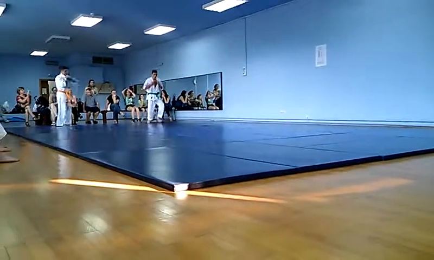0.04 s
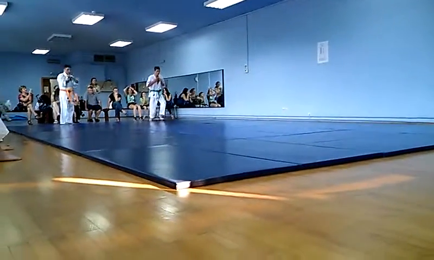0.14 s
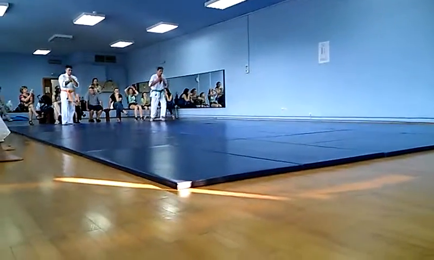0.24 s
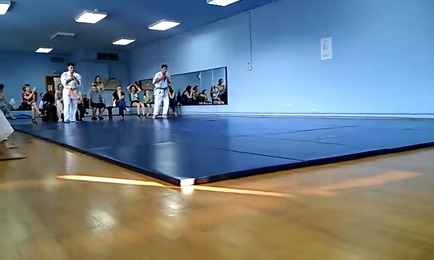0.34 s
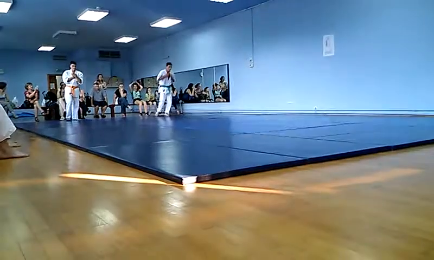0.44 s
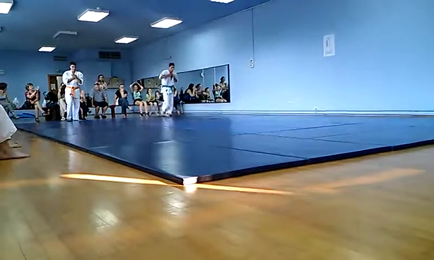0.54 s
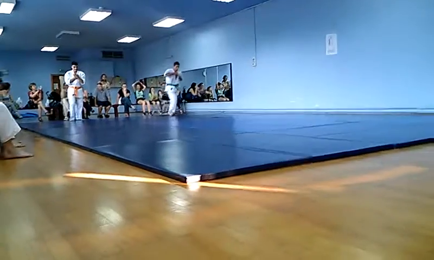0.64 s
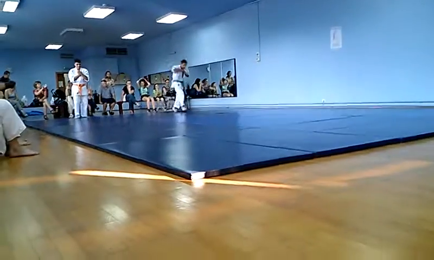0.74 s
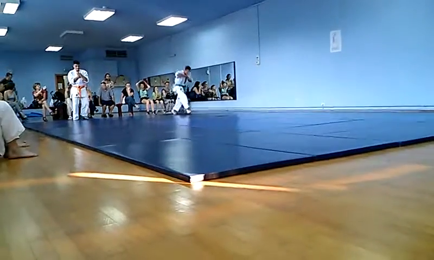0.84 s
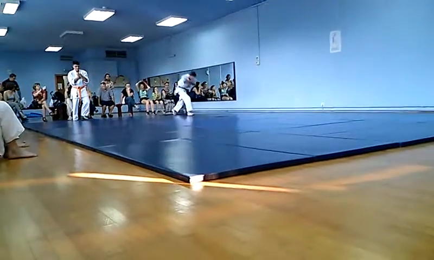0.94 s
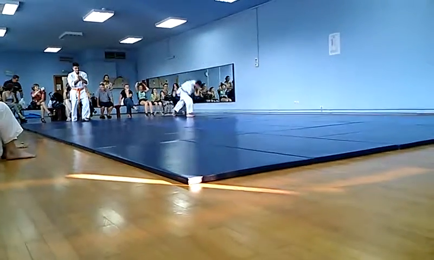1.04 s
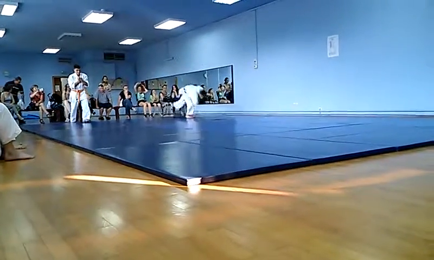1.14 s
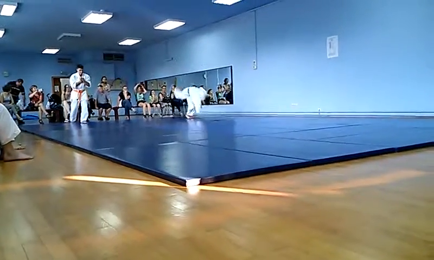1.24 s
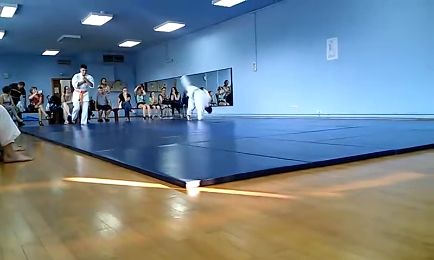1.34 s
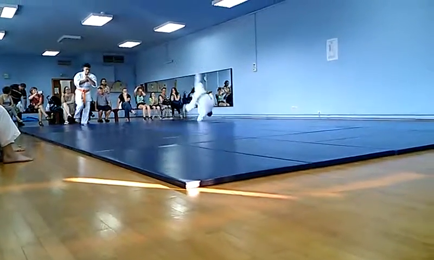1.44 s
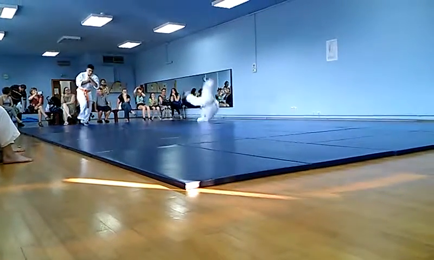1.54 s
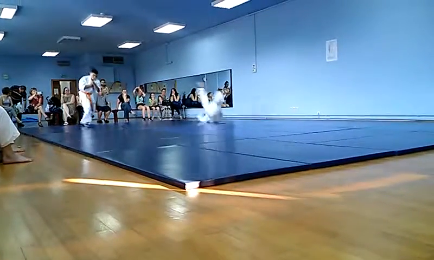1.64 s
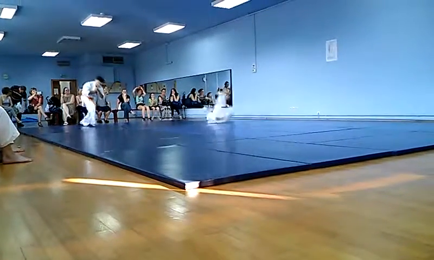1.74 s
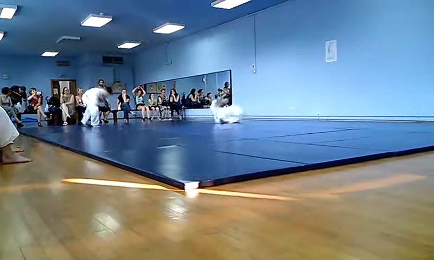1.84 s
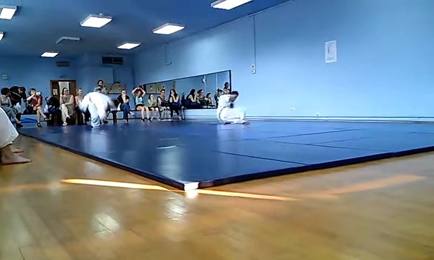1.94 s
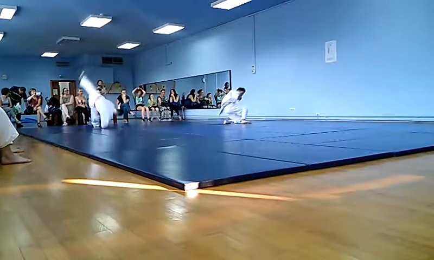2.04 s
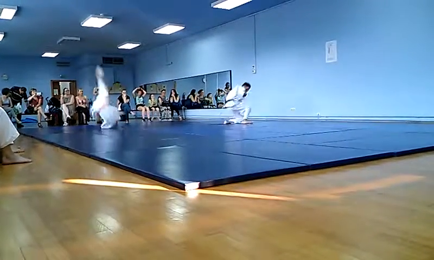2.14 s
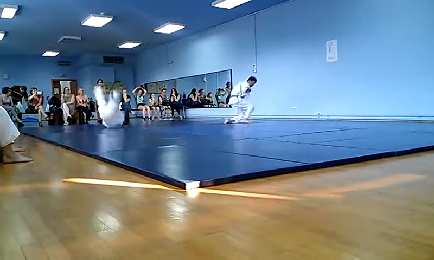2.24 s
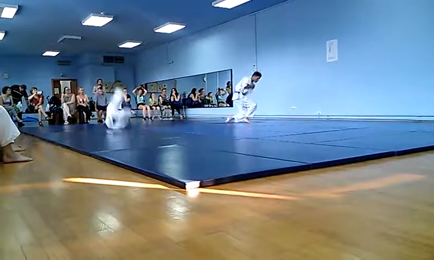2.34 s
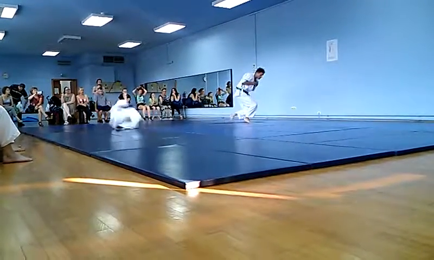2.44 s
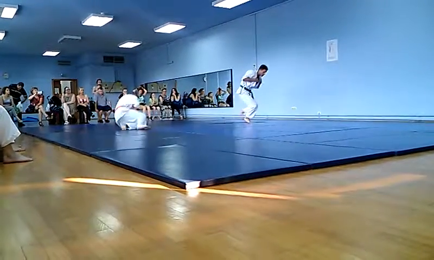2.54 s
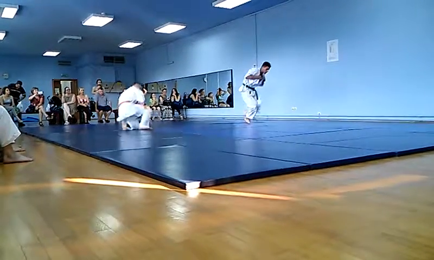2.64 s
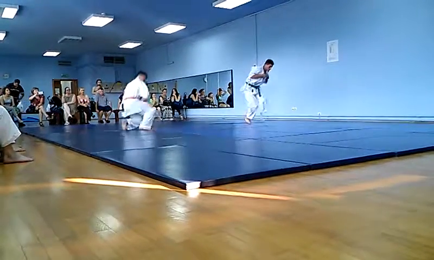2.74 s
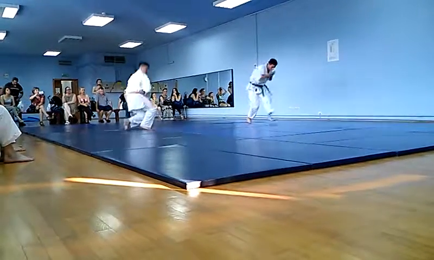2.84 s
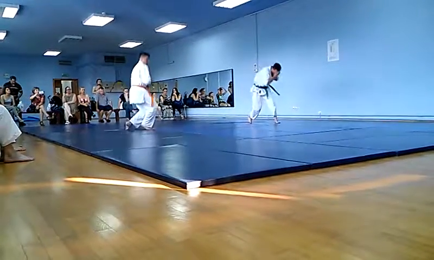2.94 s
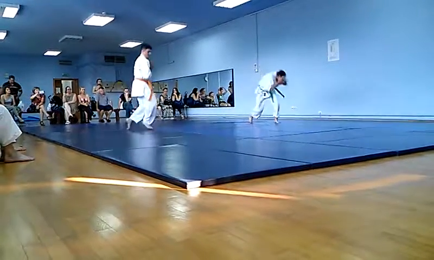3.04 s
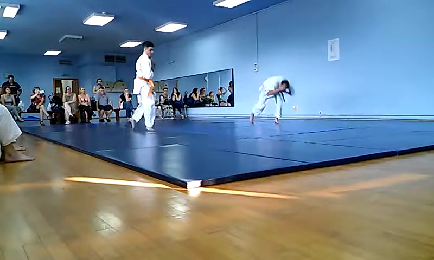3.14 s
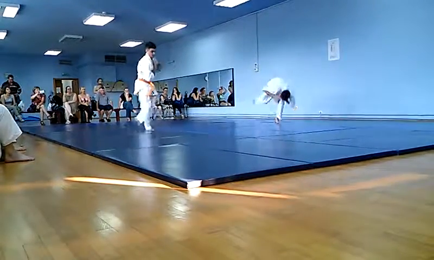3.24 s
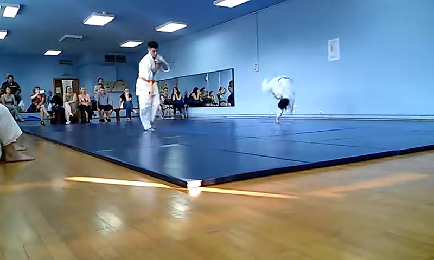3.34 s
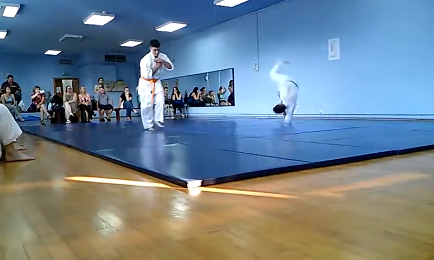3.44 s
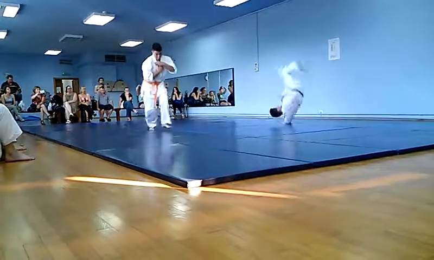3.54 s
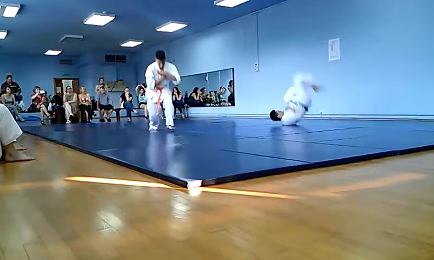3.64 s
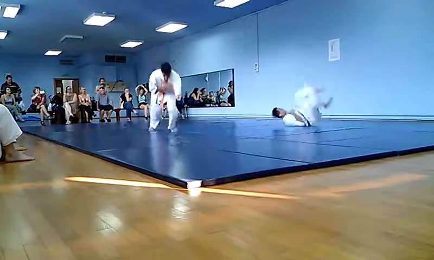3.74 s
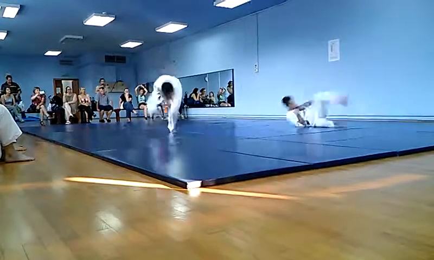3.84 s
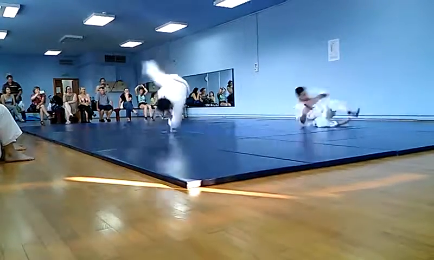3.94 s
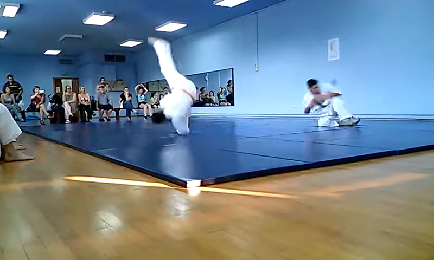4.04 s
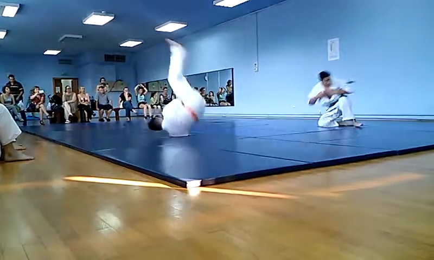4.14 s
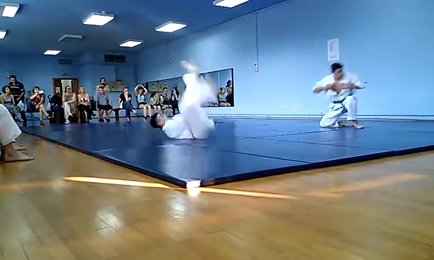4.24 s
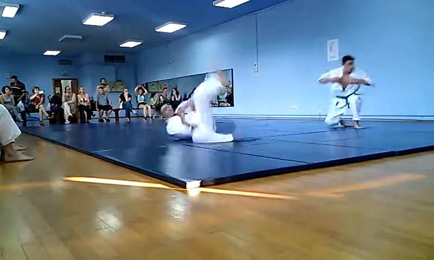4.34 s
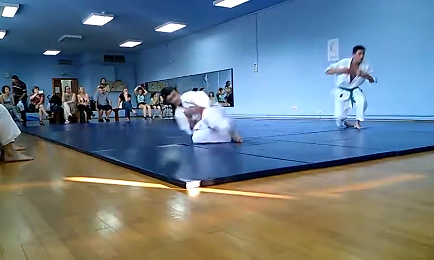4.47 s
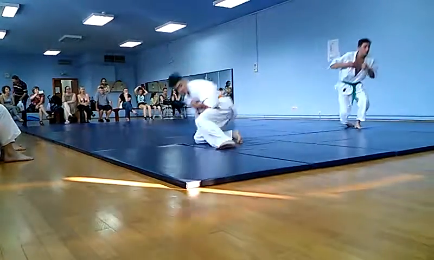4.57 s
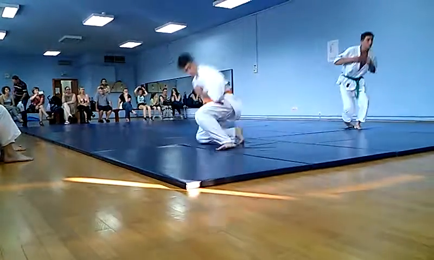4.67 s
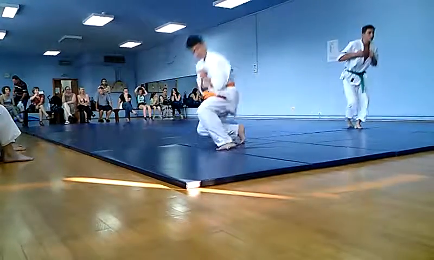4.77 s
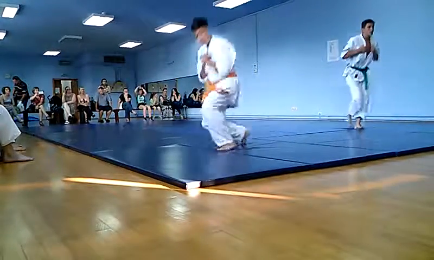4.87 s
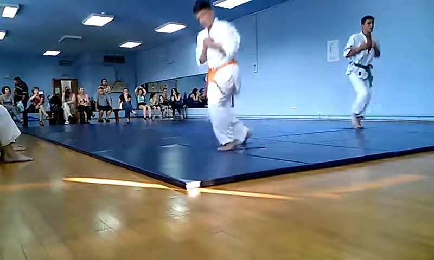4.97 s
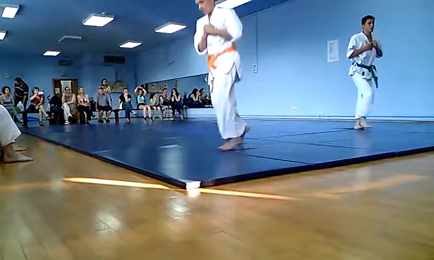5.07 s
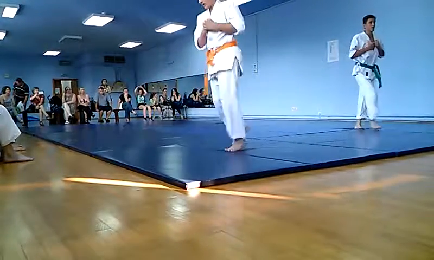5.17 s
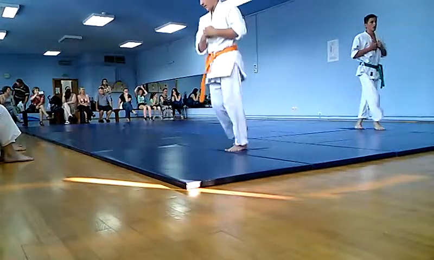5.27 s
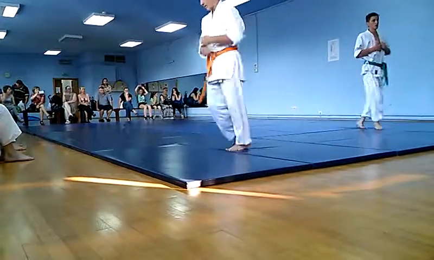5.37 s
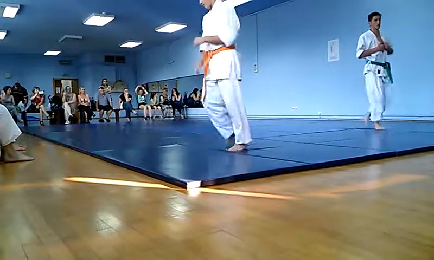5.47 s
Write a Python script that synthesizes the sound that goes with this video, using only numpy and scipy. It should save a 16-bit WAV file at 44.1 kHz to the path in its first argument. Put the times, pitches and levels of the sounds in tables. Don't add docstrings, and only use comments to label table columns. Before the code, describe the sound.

Two people roll and fall on gym mats in a hard-walled hall: sharp slaps and deep floor booms in three bursts, each ringing out.

```python
import sys
import numpy as np
from scipy import signal
from scipy.fft import rfft, irfft
from scipy.io import wavfile
from scipy.ndimage import uniform_filter1d

SR = 44100
rng = np.random.default_rng(int(sys.argv[2]) if len(sys.argv) > 2 else 0)


def elevation(decibels):
    levels = np.asarray(decibels, float)
    return 10 ** (levels / 20)


def file_out(sig):
    cols = np.atleast_2d(sig).T
    lim = np.clip(cols, -1, 1)
    pcm = np.round(lim * 32767).astype(np.int16)
    wavfile.write(sys.argv[1], SR, pcm)


N = 242991
TIME = np.arange(N) / SR


def level(x, db):
    return x * elevation(db) / np.sqrt(np.mean(x ** 2))


def along(table, hz):
    f, v = np.transpose(table)
    return np.interp(np.log(np.maximum(hz, 1)), np.log(f), v)


def colour(x, table, size=8192):
    bin_hz = np.arange(size // 2 + 1) * SR / size
    cepstrum = irfft(np.log(elevation(along(table, bin_hz))))
    cepstrum[1:size // 2] *= 2
    cepstrum[size // 2 + 1:] = 0
    impulse = irfft(np.exp(rfft(cepstrum)))
    return signal.fftconvolve(x, impulse)[:len(x)]


def band(x, hz, width):
    edges = [max(hz - width / 2, 5), hz + width / 2]
    return signal.sosfilt(signal.butter(2, edges, "band", fs=SR, output="sos"), x)


def walk(rate):
    held = int(SR / rate)
    steps = np.repeat(rng.standard_normal(N // held + 1), held)
    return 1.39 * uniform_filter1d(uniform_filter1d(steps, held), held)[:N]


def add(out, x, s):
    i = int(s * SR)
    out[i:i + len(x)] += x[:N - i]


PLACES_S = [0, 2.2, 3.5, 4.07, 5.6]


def place(s):
    return np.searchsorted(PLACES_S, s) - 1


# start_s, peak_db, length_ms,
# lowest_hz
SLAPS = [(1.559, -60, 4.4, 1500), (1.639, -36.5, 7.6, 1010), (1.692, -28, 6, 1500), (1.836, -29, 3.6, 3000),
         (2.2938, -16.5, 3.24, 977), (2.314, -40, 0.86, 6020), (3.054, -60, 5.8, 1010),
         (3.592, -61, 6.8, 982), (3.666, -32, 10.5, 3500), (3.719, -26.5, 6, 1480), (3.731, -30.5, 6, 1454),
         (3.77, -33, .8, 7000), (3.7787, -20.5, 1.4, 7500), (3.783, -25.5, 0.84, 7500),
         (3.785, -26, 2.2, 6360), (3.79, -18, 2.3, 2000), (3.826, -32.5, 3.8, 4900),
         (3.868, -33, 7.3, 5000), (3.882, -36.5, 4, 5500), (4.111, -36, 6.5, 1000), (4.149, -39, 5, 1023),
         (4.1874, -21, 2.1, 2000), (4.196, -28.5, 2.2, 3000), (4.224, -30, 1.6, 3000),
         (4.2303, -3, 4.7, 990), (4.277, -31.5, 1.5, 5000), (4.3718, -18.5, 1.9, 5580),
         (4.418, -8.5, 4, 3970), (5.3, -70, 35, 7940), (5.35, -66.5, 30, 8200)]
# frequency_hz, density_db (per Hz)
VINYL = [(590, -21.5), (1000, -16.5), (1420, 1), (2560, -3.5), (3580, -1), (4070, -4), (4960, -2.5),
         (10800, -16.5), (16000, -40.5)]
# frequency_hz, density_db (per Hz)
CLOTH = [(880, -26), (1500, 1.5), (1850, -8.5), (2560, -6.5), (3060, -10.5), (3380, -5), (5170, -6.5),
         (5600, -10.5), (6180, -11.5), (11700, -30.5), (15100, -39.5), (16000, -48)]
CRACK_HALL_DB = [5.5, 7, 0.5, -9]
HALL_DB_PER_OCTAVE, HALL_DB_PER_LENGTH = -2, 3.5
HARD_TOP_HZ, DULLING = 16840, .3


def slaps():
    near, far, t = np.zeros(N), np.zeros(N), TIME[:3000]
    click = level(colour(1. * (t == 0), CLOTH), -22.5)
    for s, db, ms, low_hz in SLAPS:
        hall_db = CRACK_HALL_DB[place(s)]
        hall_db += HALL_DB_PER_OCTAVE * np.log2(low_hz / 1000) + HALL_DB_PER_LENGTH * np.log2(ms / 5)

        air, pops = rng.standard_normal((2, len(t)))
        air = colour(air, VINYL)
        air = signal.sosfilt(signal.butter(3, low_hz, "high", fs=SR, output="sos"), air)
        top_hz = min(max(HARD_TOP_HZ * elevation(DULLING * db), 2.1 * low_hz), .45 * SR)
        air = signal.sosfilt(signal.butter(2, top_hz, fs=SR, output="sos"), air)

        pop_gain = elevation(4 * np.repeat(pops, 30)[:len(t)])
        age = t * 1000 / max(ms, .3)
        crack = level(air * pop_gain, db - 3) * np.sqrt(age) * np.exp(-age ** 3 / 3)
        ceiling = elevation(-8) * band(np.roll(crack, int(.0095 * SR)), 3500, 5000)
        add(near, crack + ceiling, s)

        far_click = signal.lfilter(*signal.butter(1, .6 * low_hz, "high", fs=SR), click)
        add(far, elevation(db + hall_db) * level(far_click, -22), s)
    return near, far


# start_s, peak_db, pitch_hz, held_s
LANDINGS = [(1.725, -18, 74.6, 0.038), (1.761, -19.5, 63.6, 0.049), (2.307, -5.5, 70.5, 0.03),
            (2.38, -7, 71.8, 0.04), (2.475, -18, 64.3, 0.029), (3.612, -15.5, 67, 0.049),
            (3.728, -4.5, 88.8, 0.03), (3.768, -6, 69, .028), (4.243, -5.5, 64.8, 0.052),
            (4.312, -8.5, 59.7, 0.045), (4.412, -8, 62.2, 0.067), (4.483, -20, 64, 0.057),
            (4.645, -16.5, 66.2, 0.022), (4.679, -24.5, 59.2, 0.058)]
# start_s, peak_db
REBOUNDS = [(1.812, -22.5), (1.874, -33), (1.956, -37.5), (2.524, -25.5), (2.601, -37), (3.684, -19.5),
            (3.805, -18.5), (3.874, -20), (3.941, -17.5), (4.035, -27), (4.536, -19), (4.793, -35),
            (4.898, -39)]
# start_s, peak_db
STEPS = [(0.244, -57), (.288, -59.5), (.38, -65), (.47, -57), (.52, -57), (0.892, -60), (.96, -66),
         (2.135, -38), (2.189, -45), (2.765, -42), (3.179, -50.5), (3.428, -46), (4.194, -23),
         (5.119, -44.5), (5.199, -41.5)]
REBOUND_HZ, REBOUND_S = 82, 0.025
STEP_HZ, STEP_S, PITCH_SCATTER = 98, 0.031, .06


def thuds():
    out, t = np.zeros(N), TIME[:12000]
    light = [(s, db, REBOUND_HZ, REBOUND_S) for s, db in REBOUNDS]
    light += [(s, db, STEP_HZ, STEP_S) for s, db in STEPS]
    scatter = 1 + PITCH_SCATTER * rng.standard_normal(len(light))
    light = [(s, db, hz * k, held) for (s, db, hz, held), k in zip(light, scatter)]
    for s, db, hz, held in list(LANDINGS) + light:
        phase = 2 * np.pi * hz * t * (1 + 0.14 * np.exp(-t / .02))
        stiff_mode = elevation(-19.0) * np.sin(2.87 * phase) * np.exp(-t / 0.073)
        swing = np.sin(phase) + stiff_mode
        rise = 1 - np.exp(-t / .007)
        choke = np.exp(-(t / max(held, .01)) ** 4)
        add(out, -elevation(db + 1) * rise * choke * swing, s)
    return out


# start_s, level_db, pitch_hz, decay_ms
KNOCKS = [(1.6, -50, 750, 21), (1.642, -36, 625, 14), (1.692, -32.5, 1100, 9), (1.720, -24.5, 201.5, 43),
          (1.83, -24, 658, 16), (2.295, -13.5, 1240, 6.5), (2.305, -20, 558, 41), (2.371, -31.5, 402, 57),
          (2.43, -30, 534, 16), (2.45, -28.5, 852, 62), (3.591, -37, 568, 7.7), (3.645, -35, 667, 24),
          (3.673, -27, 602, 16), (3.727, -21.5, 524, 14), (3.729, -22, 203, 30), (3.785, -22, 602, 33),
          (3.825, -31, 673, 11), (4.112, -32, 1184, 15), (4.156, -32.5, 1300, 16),
          (4.1888, -15, 246.5, 9.4), (4.23, -12.5, 1416, 8.7), (4.241, -17, 1450, 4.5),
          (4.281, -19.5, 397, 15), (4.371, -19.5, 211, 74), (4.42, -18, 1360, 17), (4.125, -36, 2430, 28),
          (4.198, -26.5, 486, 12), (3.74, -30.5, 2260, 19), (3.56, -51.5, 695, 21.5),
          (4.188, -26, 4900, 6.5)]
# start_s, level_db, pitch_hz
HEELS = [
    (2.176, -48, 270),
    (3.045, -55, 440),
    (3.2, -66, 350),
    (4.82, -49, 591),
    (5.038, -51.5, 458),
    (5.05, -59, 900),
    (5.092, -55, 424),
    (5.13, -61, 900),
    (5.19, -55.5, 540),
]
HEEL_MS = 28
# frequency_hz, density_db (per Hz)
FOAM = [(71, -37.5), (120, 3), (232, -9), (334, -9), (398, -10.5), (494, -9.5), (565, -11), (791, -12.5),
        (869, -9.5), (1040, -15.5), (1270, -14), (1730, -24.5), (3000, -24.5), (3900, -42), (6600, -120)]
KNOCK_HALL_DB = [0, 3, 0.3, -5]


def knocks():
    near, far, t = np.zeros(N), np.zeros(N), TIME[:6000]
    click = 1. * (t == 0)
    for s, db, hz, ms in list(KNOCKS) + [(*heel, HEEL_MS) for heel in HEELS]:
        body = rng.standard_normal(len(t))
        knock = level(colour(body, FOAM), -2.0) + level(band(body, hz, 0.16 * hz), 0)
        shape = (1 - np.exp(-t / 0.0027)) * np.exp(-t * 1000 / max(ms, 2))
        add(near, elevation(db + 0.5) * knock * shape, s - .001)
        thump = level(colour(click, FOAM), -18) + level(band(click, hz, 0.17 * hz), -19.5)
        add(far, elevation(db + KNOCK_HALL_DB[place(s)]) * thump, s)
    return near, far


# start_s (at full level), held_s, scrape_db, rumble_db (over the scrape)
DRAG = [(.1, .85, -78, 10), (1.24, .06, -73.5, 4.5), (1.63, .015, -55.5, 1), (1.73, 0.053, -41.5, 13),
        (1.83, 0.018, -41, 6), (2.0, 0.24, -67.5, 19), (2.28, 0.026, -47, 0), (2.342, 0.082, -35, 15.5),
        (2.9, 0.53, -70, 8.5), (2.94, 0.025, -68, 2), (3.07, 0.073, -64.5, 5.5), (3.29, .1, -65.5, -5),
        (3.679, 0.11, -37.5, 10.5), (3.8, 0.11, -47, 11.5), (4.126, 0.047, -40, 7.5), (4.291, 0.1, -26, 4),
        (4.37, 0.093, -29.5, 2.5), (4.5, 0.081, -39, -6), (5.079, 0.34, -74, 13.5)]
DRAG_RISE_DB_S, DRAG_FALL_DB_S = 266, 140.5
PATCHY_DB, FAINT_PATCHY_DB, FAINT_UNDER_DB = 3.5, 3.1, -60


def drag():
    scrape = level(colour(rng.standard_normal(N), CLOTH), 0)
    catches = walk(70)
    bold = scrape * elevation(PATCHY_DB * catches)
    faint = scrape * elevation(FAINT_PATCHY_DB * catches)
    shuffle = level(colour(rng.standard_normal(N), FOAM), 0) * elevation(0.35 * walk(30))
    out = np.zeros(N)
    for s, held, db, dull_db in DRAG:
        under_db = DRAG_RISE_DB_S * np.maximum(s - TIME, 0)
        under_db += DRAG_FALL_DB_S * np.maximum(TIME - s - held, 0)
        hiss = bold if db > FAINT_UNDER_DB else faint
        out += elevation(db - under_db) * (hiss + elevation(dull_db) * shuffle)
    return out


# frequency_hz, t60_s
HALL_T60 = [(60, 0.7), (150, 0.88), (400, 0.64), (1000, 0.89), (3000, 1), (6000, 1), (12000, 0.99)]


def hall(x, build_s=0.0065):
    out, t = np.zeros(N), TIME[:int(1.3 * SR)]
    for start, end in zip(PLACES_S, PLACES_S[1:]):
        echo, walls = 0, walk(79.56)
        for k, hz in enumerate(45 * 2 ** np.arange(0, 8.6, .5)):
            lumps_db = 3 * walls[k * 4000:][:len(t)] * np.exp(-t / .25)
            ring = band(rng.standard_normal(len(t)), hz, hz * .35)
            echo = echo + ring * elevation(lumps_db - 60 * t / along(HALL_T60, hz))
        echo = echo * (1 - np.exp(-(t / build_s) ** 2))
        echo = echo / np.sqrt(np.sum(echo ** 2))
        add(out, signal.fftconvolve(x[int(start * SR):int(end * SR)], echo), start)
    return out


# frequency_hz, density_db (per Hz)
AIR = [(45, -1.5), (70, 1.5), (100, -2), (138, -5.5), (160, -14.5), (260, -12), (500, -15.5), (800, -18.5),
       (1000, -15.5), (1900, -29.5), (2250, -23), (3300, -31.5), (5000, -28), (16000, -44)]
AIR_DB = -62
# pitch_hz, haze_db, width_hz, line_db (steady tone over the haze)
HUM = [(135, -74, 16, -8), (300.3, -82, 6, 13), (984.5, -82, 10, 5)]
HUM_BEAT_S, HUM_BEAT_PEAK_S, HUM_BEAT_DB = 1.24, .42, 2.5
LULL_S, LULL_LENGTH_S, LULL_DB = 1.18, 0.053, -4


def room_tone():
    out, swell = 0, walk(0.83)
    for hz in 25 * 2 ** np.arange(0, 9.6, .5):
        ring = band(rng.standard_normal(N), hz, hz * .35)
        wander_db = (.8 * swell + 2.5 * walk(5)) * min(1, (600 / hz) ** .5)
        out = out + ring * elevation(wander_db)
    lull_db = LULL_DB * np.exp(-((TIME - LULL_S) / LULL_LENGTH_S) ** 2)
    out = level(colour(out, AIR), AIR_DB - 3) * elevation(lull_db)
    for hz, db, width, line_db in HUM:
        haze = level(band(rng.standard_normal(N), hz, width), db)
        line = elevation(db + line_db) * np.sin(2 * np.pi * hz * TIME)
        beat_db = HUM_BEAT_DB * (hz > 500) * np.cos(2 * np.pi * (TIME - HUM_BEAT_PEAK_S) / HUM_BEAT_S)
        out = out + elevation(beat_db) * (haze + line)
    return out


GATE_FROM_DB, GATE_SLOPE, GATE_OPEN_DB = -65, 0.58, 17.5
GATE_SENSE_S, GATE_CLOSE_DB_S = 0.05, 24


def gate(x):
    power = np.abs(uniform_filter1d(x ** 2, int(GATE_SENSE_S * SR)))
    loud_db = 10 * np.log10(power + 1e-9)
    lift_db = np.clip(GATE_SLOPE * (loud_db - GATE_FROM_DB), 0, GATE_OPEN_DB)
    closing_db = GATE_CLOSE_DB_S * TIME
    return np.maximum.accumulate(lift_db + closing_db) - closing_db


def scene():
    crack, far_crack = slaps()
    knock, far_knock = knocks()
    boom, cloth = thuds(), drag()
    wet = hall(elevation(7) * (far_crack + far_knock) + elevation(-4.5) * boom + elevation(-4.5) * cloth)
    near = crack + knock + boom + elevation(-3.5) * cloth
    lift_db = gate(near + elevation(1.5) * wet)
    mix = near + elevation(0.94 * (lift_db - 19.5)) * wet + elevation(lift_db + 1.0) * room_tone()
    return mix[None]


# pitch_hz, width_hz, lift_db
PHONE = [(1450, 87, 2.5), (2450, 740, 1), (3590, 500, 1.5), (5000, 800, 3)]


def top_cut(x):
    return signal.sosfilt(signal.butter(12, 16470, fs=SR, output="sos"), x)


def record(dry):
    dry = signal.sosfilt(signal.butter(2, 27, "high", fs=SR, output="sos"), dry)
    ringing = sum((elevation(db) - 1) * signal.lfilter(*signal.iirpeak(hz, hz / width, SR), dry)
                  for hz, width, db in PHONE)
    dry = dry + ringing
    hiss = elevation(-80) * rng.standard_normal(dry.shape)
    drive = (dry + hiss) / 1.015
    rounded = .96 * np.tanh(drive + drive ** 3 / 3)
    top = signal.ellip(8, .2, 40, 15850, fs=SR, output="sos")
    finished = signal.sosfilt(top, rounded)
    return top_cut(finished)


dry = scene()
out = record(dry)
file_out(out)
```